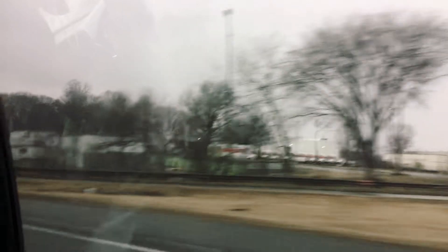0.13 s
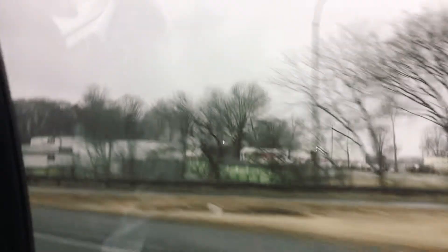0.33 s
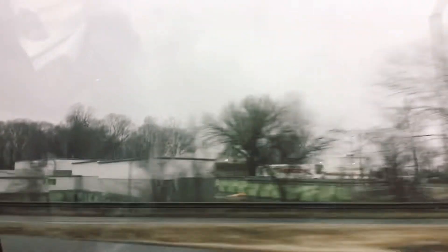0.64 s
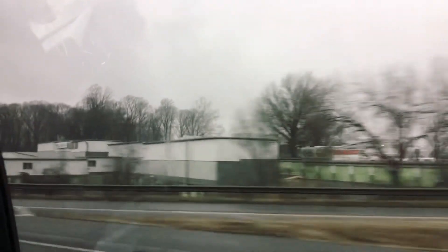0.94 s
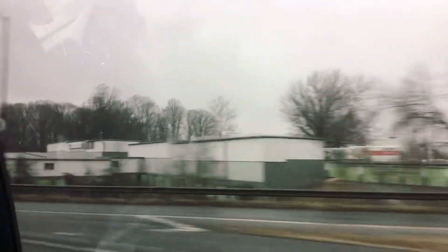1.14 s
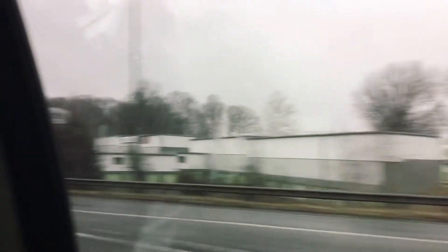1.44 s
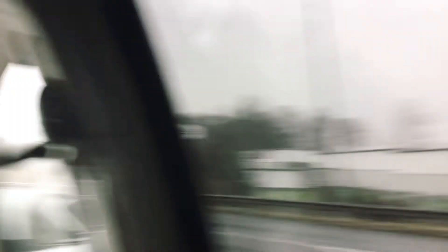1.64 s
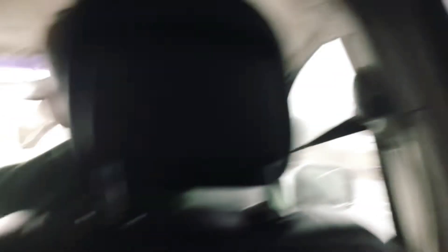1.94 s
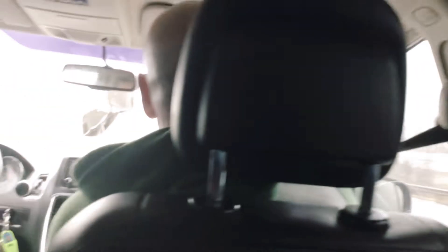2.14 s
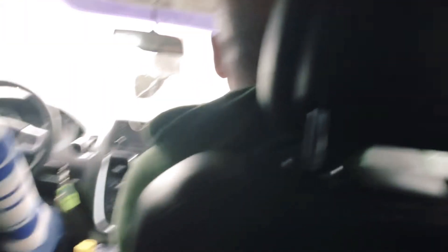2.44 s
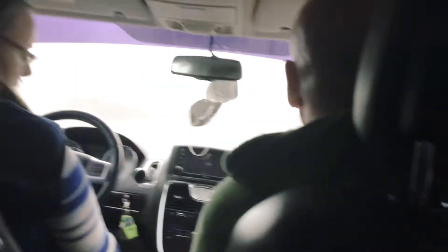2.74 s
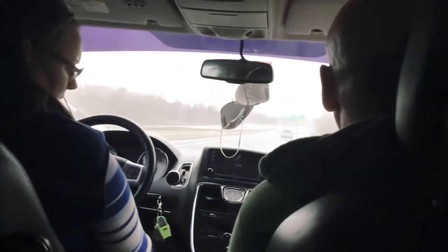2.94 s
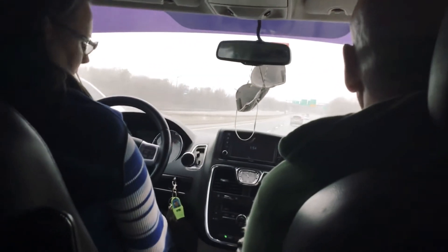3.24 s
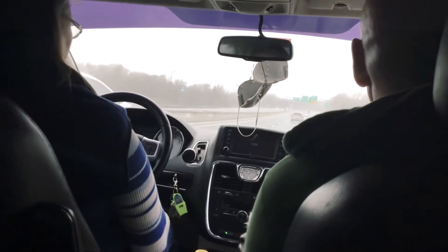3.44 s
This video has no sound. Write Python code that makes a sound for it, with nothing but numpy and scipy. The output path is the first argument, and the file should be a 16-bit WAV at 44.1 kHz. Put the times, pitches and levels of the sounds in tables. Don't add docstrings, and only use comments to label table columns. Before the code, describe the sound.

Low road and engine rumble inside a moving car, swelling slightly, with soft bumps later on

```python
import sys
import numpy as np
from scipy import signal
from scipy.fft import rfft, irfft
from scipy.io import wavfile
from scipy.ndimage import uniform_filter1d

SR = 44100
rng = np.random.default_rng(int(sys.argv[2]) if len(sys.argv) > 2 else 0)


def master_out(mix):
    frames = np.transpose(np.atleast_2d(mix))
    ceiling = np.clip(frames, -1, 1)
    pcm = np.round(ceiling * 32767).astype(np.int16)
    wavfile.write(sys.argv[1], SR, pcm)


def invert_db(x):
    u = np.asarray(x, float) / 20
    return 10 ** u


N = 158760
T = np.arange(N) / SR
F = np.arange(N // 2 + 1) * SR / N + 1e-3

# time in seconds, recorder gain in dB, turn towards the vents in dB,
# tyre whir at the side glass in dB.
PHONE_MOVES = [(.1, -54, 0, 1), (.6, -53, 1.5, 1), (.95, -51.5, -0.5, 0), (1.2, -50, -1.5, 1),
               (1.6, -49.5, -0.5, 2), (1.9, -48.5, -1.5, -1.5), (2.2, -48.5, -2, 0.5), (2.5, -49, -1, 0.5),
               (2.75, -47.5, 0, -1), (3.0, -46.5, 1.5, -1), (3.3, -45, 0.5, 0), (3.6, -44.5, 2.5, -1)]
# time in seconds, level in dB.
ROAD_ROUGHNESS = [(.1, -1), (.5, -0.5), (.75, 2), (1.2, -1), (1.8, -0.5), (2.2, 0), (2.6, -1.5), (3.0, 0.5),
                  (3.3, -1), (3.6, -2)]
# frequency in Hz, level in dB per Hz.
RUMBLE_COLOUR = [(25, -37.5), (45, -18), (65, -3), (90, -1), (125, -5.5), (175, -8), (260, -16),
                 (420, -29.5)]
# frequency in Hz, level in dB per Hz.
ROAR_COLOUR = [(250, -3.5), (460, -4), (900, -9.5), (1450, -12), (3400, -24), (4000, -27.5), (5500, -36.5),
               (8500, -52)]
# frequency in Hz, level in dB per Hz.
HISS_COLOUR = [(6000, 0), (9000, -5.5), (12500, 0), (14000, -3), (14600, -8), (15500, -21.5)]
# frequency in Hz, width in Hz, lift in dB.
CABIN_RESONANCES = [(324, 13, 2), (521, 22, 2), (800, 35, 6), (1274, 100, 1.5), (1450, 26, 3.5),
                    (3260, 290, 2.5), (3770, 50, 2)]
# time in seconds, firing tone level in dB.
FIRING_LEVEL = [(.1, -55), (.55, -62), (.75, -37), (1.1, -35.5), (1.4, -34.5), (1.75, -31.5), (1.9, -38),
                (2.0, -31.5), (2.25, -32.5), (2.36, -45.5), (2.6, -41), (3.0, -44.5), (3.3, -42),
                (3.45, -38.5), (3.6, -51)]
# multiple of the firing rate, level in dB.
ENGINE_OVERTONES = [(2, -16), (3, -26.5), (4, -25)]
# start in seconds, length in seconds, level in dB.
KEY_SHIVERS = [
    (.45, 0.13, -100),
    (1.2, .25, -103),
    (1.7, .05, -92),
    (2.25, .05, -99),
    (2.66, .12, -93),
    (2.876, .12, -95),
    (3.25, .1, -93),
]
# time in seconds, level in dB, body swing in Hz, half length in seconds.
ROAD_SEAMS = [(.70, -36, 87, 0.044), (1.711, -31.5, 84, .015), (1.986, -36, 87, .03),
              (2.327, -27.5, 80, .015), (2.393, -26, 76, 0.016), (2.437, -31, 67.6, 0.03),
              (2.803, -26, 88, .013), (2.859, -24.5, 72.6, 0.031), (3.087, -26, 87, 0.019),
              (3.171, -23.5, 85.4, 0.024), (3.271, -25.5, 81, .02), (3.351, -24.5, 87, 0.013),
              (3.397, -29, 81, 0.013), (3.548, -33, 69.6, 0.027)]
# start in seconds, level in dB, length in seconds, centre in Hz.
FINGER_BRUSHES = [
    (1.764, -86, .02, 10900),
    (1.951, -75, 0.026, 7500),
    (2.325, -86, 0.03, 12100),
    (2.472, -80, .04, 8000),
    (2.551, -84, 0.0071, 6500),
    (3.26, -86, .08, 11750),
]
# time in seconds, level in dB, pitch in Hz.
METAL_TINKLES = [
    (2.211, -75, 12700),
    (2.235, -86, 10300),
    (3.457, -88, 14500),
]


def curve(rows, column):
    return np.interp(T, np.array(rows)[:, 0], np.array(rows)[:, column])


def level(x):
    return x / np.sqrt(np.mean(x ** 2))


def walk(rate_hz):
    hold = int(SR / rate_hz)
    draws = rng.standard_normal(N // 50)[:N // hold + 1]
    steps = np.repeat(draws, hold)
    return uniform_filter1d(uniform_filter1d(steps, hold), hold)[:N]


def band(hz, width_hz):
    bell = np.exp(-((F - hz) / width_hz) ** 2)
    return level(irfft(rfft(rng.standard_normal(N)) * bell, N))


def turbulence(colour, swell_db, flicker_db, lifts=()):
    hz_points, db_points = np.array(colour).T
    beyond_octaves = np.abs(np.log2(F / np.clip(F, hz_points[0], hz_points[-1])))
    db = np.interp(np.log(F), np.log(hz_points), db_points) - 24 * beyond_octaves
    for hz, width_hz, lift_db in CABIN_RESONANCES:
        db = db + lift_db * np.exp(-((F - hz) / width_hz) ** 2)
    spectrum = rfft(rng.standard_normal(N)) * invert_db(db)
    spectrum = spectrum / np.sqrt(np.mean(irfft(spectrum, N) ** 2))
    swell = swell_db * walk(3)
    out = 0
    for hz in 20 * 2 ** np.arange(0, 9.8, 1 / 3):
        triangle = np.clip(1 - 3 * np.abs(np.log2(F / hz)), 0, 1)
        move_db = swell + flicker_db * walk(7.3)
        for lift_hz, lift_db in lifts:
            move_db = move_db + lift_db * np.exp(-(np.log2(hz / lift_hz) / 0.55) ** 2)
        out = out + irfft(spectrum * triangle, N) * invert_db(move_db)
    return out


def cut_in(dry):
    start_s, pop_level, fade_s = .0884, -.024, .0015
    i = int(start_s * SR)
    u = np.clip(T - start_s, 0, None) / fade_s
    pop = (pop_level - dry[:, i:i + 1]) * (1 - u / 2) * np.exp(-u / 2)
    gate = uniform_filter1d(1. * (T >= i / SR), size=2)
    return (dry + pop) * gate


def tyre_rumble():
    turn = [(220, 0.5 * curve(PHONE_MOVES, 2))]
    return invert_db(13 + curve(ROAD_ROUGHNESS, 1)) * turbulence(RUMBLE_COLOUR, 1.2, 1.5, turn)


def air_roar():
    vent_hz, whir_hz = 2670, 1300
    lifts = [(vent_hz, curve(PHONE_MOVES, 2)), (whir_hz, curve(PHONE_MOVES, 3))]
    return invert_db(2.5) * turbulence(ROAR_COLOUR, .6, 0.87, lifts)


def microphone_hiss():
    return invert_db(-38.5) * turbulence(HISS_COLOUR, .6, .8)


def engine():
    firing_hz, wander = 83.93, .002
    phase = 2 * np.pi * np.cumsum(firing_hz * (1 + wander * walk(4))) / SR
    tone = np.sin(phase)
    for k, db in ENGINE_OVERTONES:
        tone = tone + invert_db(db + 3.0 * walk(6)) * np.sin(k * phase + k)
    return np.sqrt(2) * invert_db(curve(FIRING_LEVEL, 1)) * tone


def air_whistle():
    peak_s, span_s = 0.71, .45
    swell = np.exp(-((T - peak_s) / span_s) ** 2)
    return invert_db(-69.5) * swell * band(3350, 110)


def keys():
    gate = sum(invert_db(db) * (T > s) * (T < s + length) for s, length, db in KEY_SHIVERS)
    return uniform_filter1d(gate, size=600) * invert_db(5.0 * walk(40)) * band(13300, 500)


def seam_thuds():
    out = 0
    for s, db, hz, half_s in ROAD_SEAMS:
        push = np.exp(-((T - s) / half_s) ** 2)
        out = out - invert_db(db) * push * np.cos(2 * np.pi * hz * (T - s))
    return out


def finger_brushes():
    attack_s, release_s = .002, .008
    out = 0
    for s, db, length, hz in FINGER_BRUSHES:
        rise = np.clip((T - s) / attack_s, 0, 1)
        fall = np.exp(-np.clip(T - s - length, 0, None) / release_s)
        out = out + invert_db(db + 3.0 * walk(150)) * rise * fall * band(hz, .75 * hz)
    return out


def metal_tinkles():
    half_s = .004
    out = 0
    for s, db, hz in METAL_TINKLES:
        out = out + invert_db(db) * np.exp(-((T - s) / half_s) ** 2) * np.sin(2 * np.pi * hz * T)
    return out


def scene():
    gain = invert_db(curve(PHONE_MOVES, 1))
    ride = gain * (tyre_rumble() + air_roar() + microphone_hiss())
    car = engine() + air_whistle() + seam_thuds()
    handling = keys() + finger_brushes() + metal_tinkles()
    return (ride + car + handling)[None]


def low_pass(x):
    return signal.sosfilt(signal.butter(12, 16000, fs=SR, output="sos"), x)


def record(dry):
    low_cut = signal.butter(4, 40, "high", fs=SR, output="sos")
    mix = cut_in(signal.sosfilt(low_cut, dry))
    return low_pass(mix)


dry = scene()
out = record(dry)
master_out(out)
```